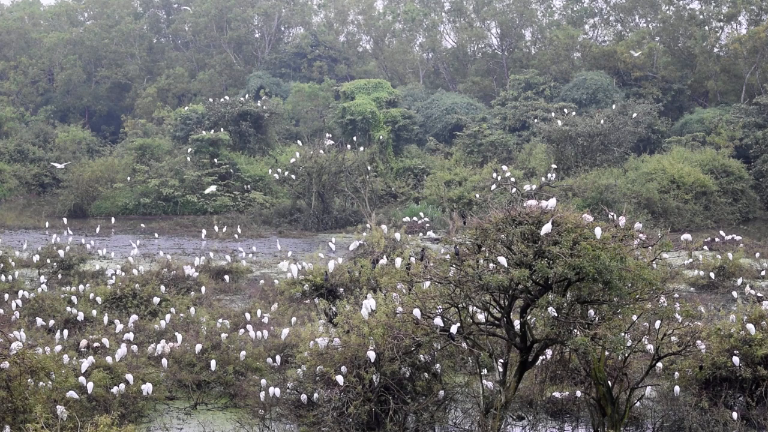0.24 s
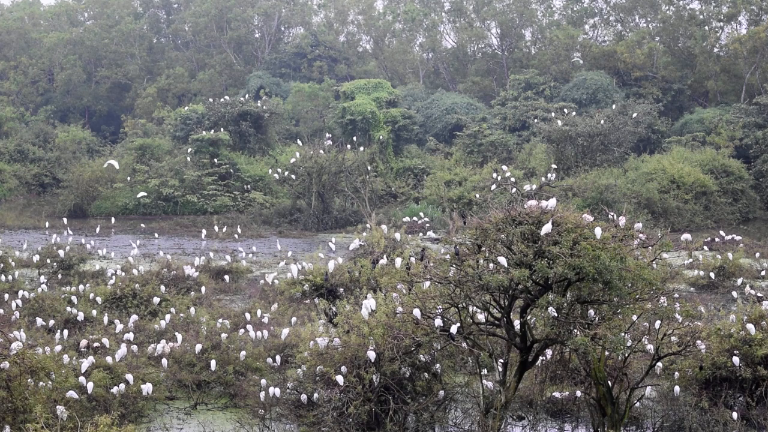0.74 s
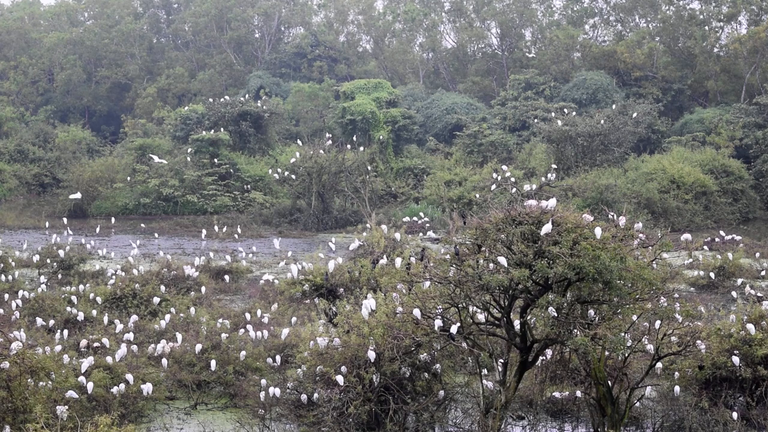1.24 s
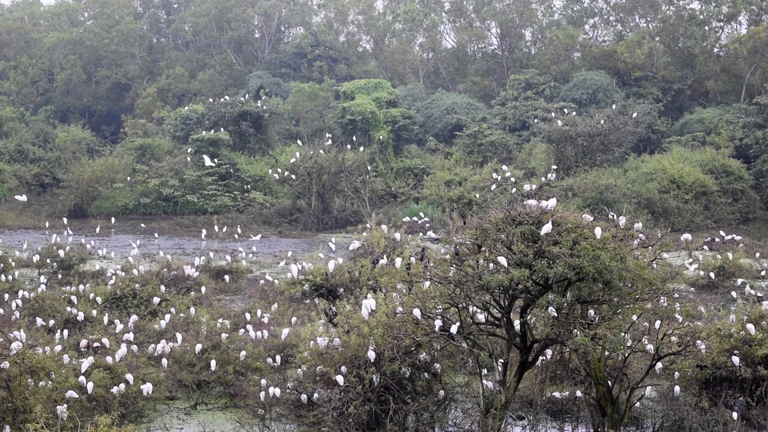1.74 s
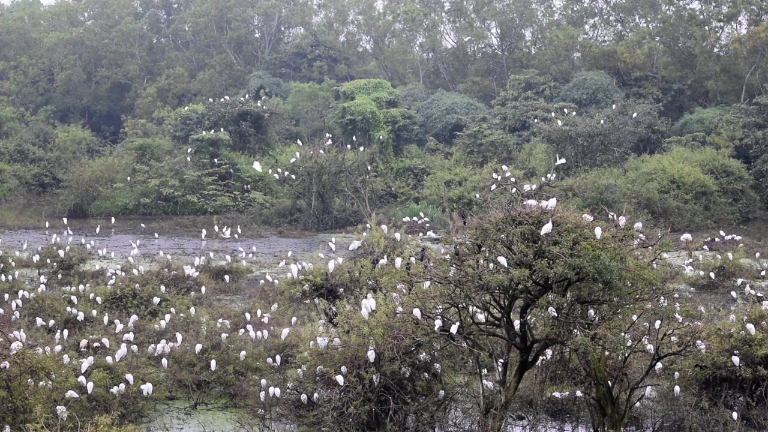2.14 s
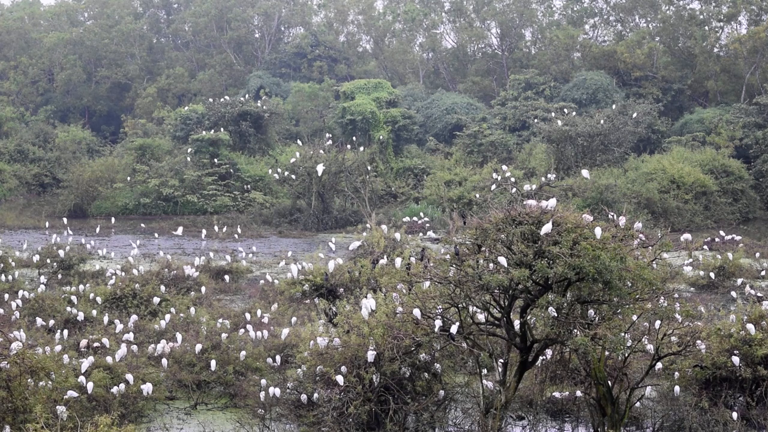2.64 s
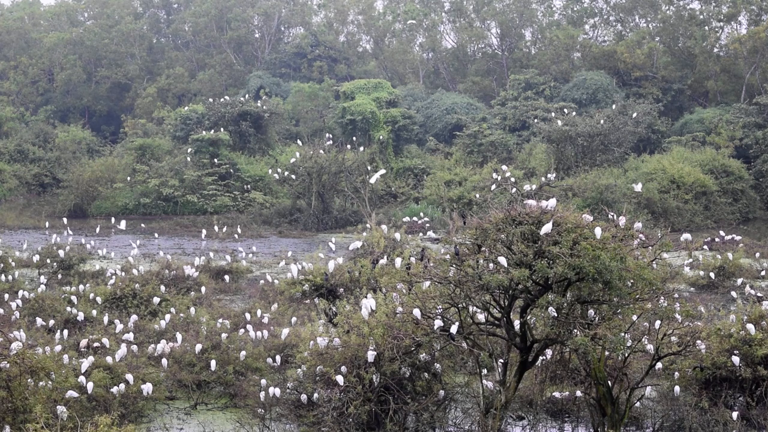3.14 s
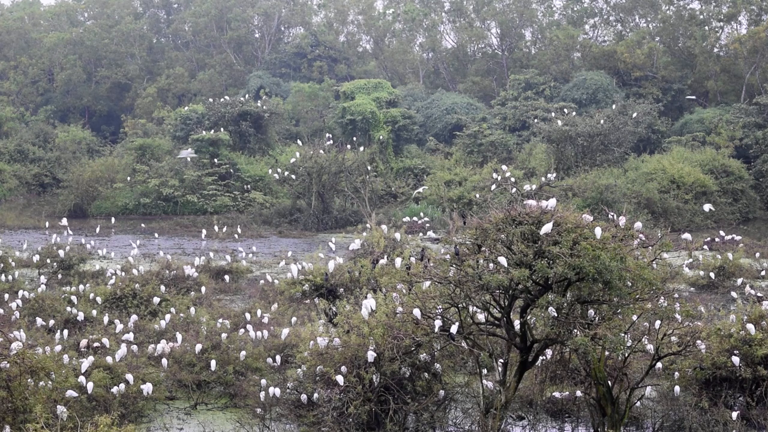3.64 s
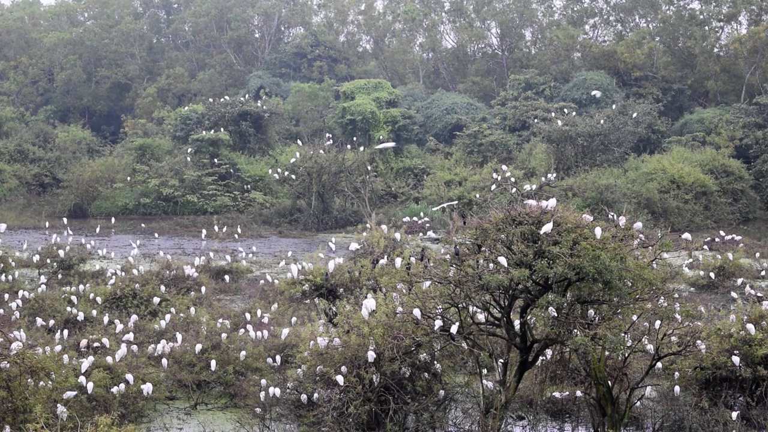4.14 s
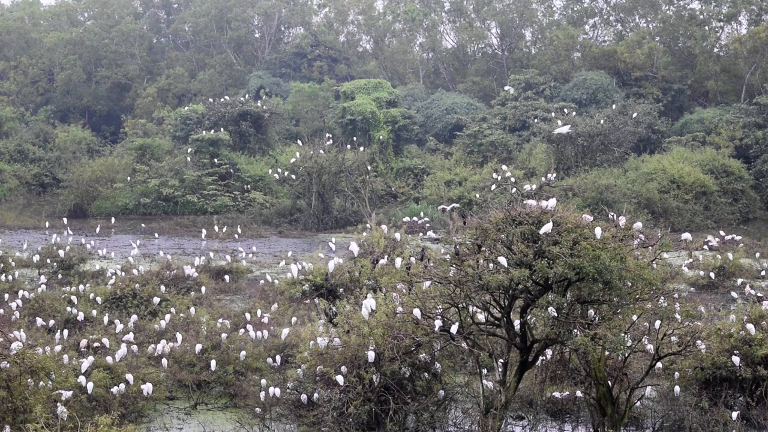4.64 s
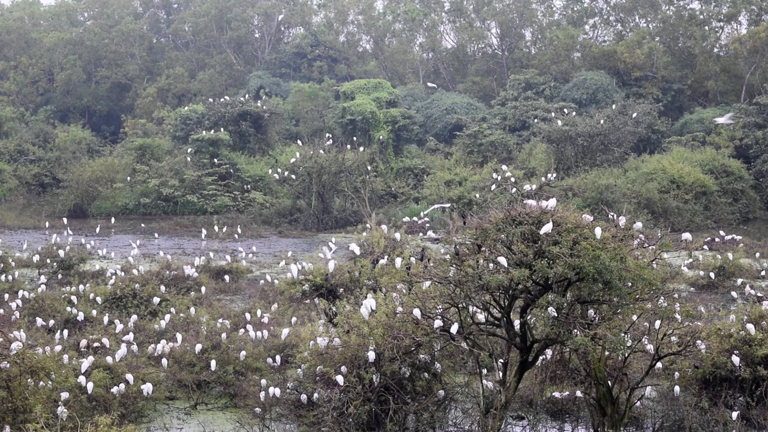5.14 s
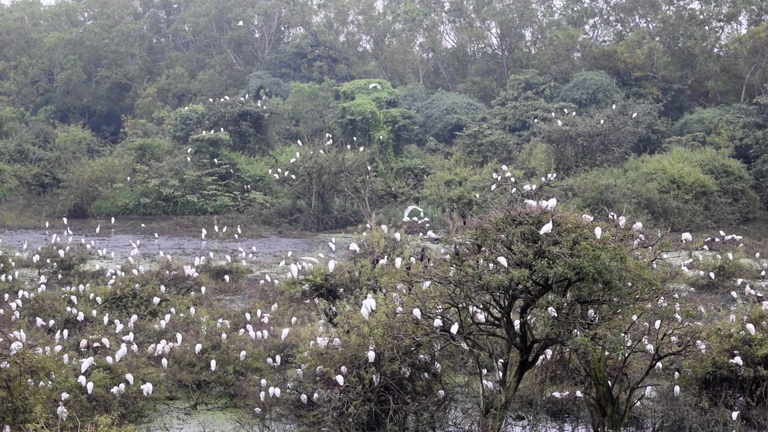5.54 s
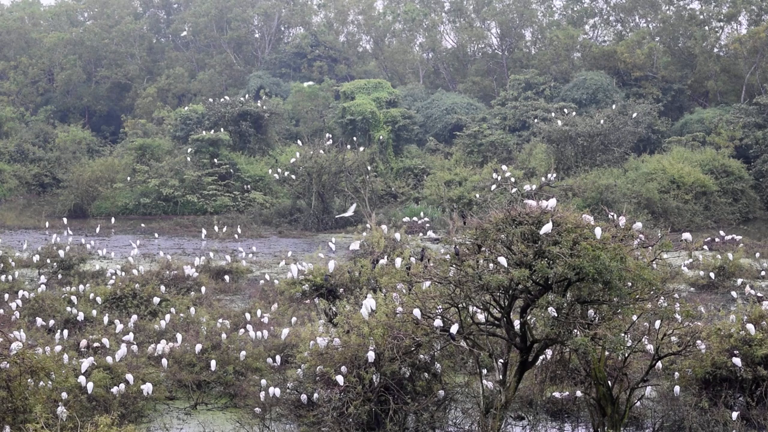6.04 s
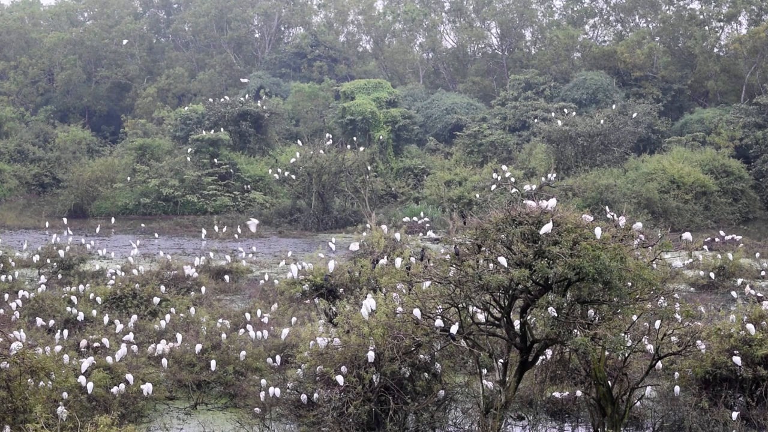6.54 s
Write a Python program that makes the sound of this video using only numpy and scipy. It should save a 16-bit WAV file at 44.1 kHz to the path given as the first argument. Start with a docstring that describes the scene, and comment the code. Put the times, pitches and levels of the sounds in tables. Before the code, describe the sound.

Continuous babble of countless waterbirds across a marsh, adults mid-pitched and rough, young ones shriller. Single croaks and short hoots or yelps stand out irregularly at first. At about three and a half seconds one close egret starts a series of about six croaks a second, abrupt and strong, soon sinking into coarser, softer rasps. Begging chicks and high trills persist; an open microphone picks up woodland reverberation and barely audible breeze.

```python
"""A near egret runs through a long series of croaks that sink and slow, made of rasping pulses and air
shaped by throat resonances. Other birds croak, squawk, screech, hoot and yelp in the same way or as whistles.
Behind them are begging chicks, thin shivering trills and a far din of voices made of patchy noise.
Insect bands, the echoing wooded bank, a light breeze on the microphone and a faint drone fill the marsh."""
import sys
import numpy as np
from scipy import signal
from scipy.fft import rfft, irfft, next_fast_len
from scipy.io import wavfile
from scipy.ndimage import map_coordinates

SR = 44100
rng = np.random.default_rng(int(sys.argv[2]) if len(sys.argv) > 2 else 0)


def put_to_file(sound):
    """Save the sound as 16-bit audio at rate SR, in the file named by the first command-line argument."""
    columns = np.atleast_2d(sound).T  # one column per channel
    safe = np.clip(columns, -1, 1)
    whole_steps = np.round(safe * 32767)
    wavfile.write(sys.argv[1], SR, whole_steps.astype(np.int16))


N = 298998

# how loud the far colony is over time: start_s, adults_db, young_db
COLONY_LEVELS = [(0, -44, -41), (.38, -43, -43), (.46, -46, -43.5), (.58, -44.5, -41), (.76, -46.5, -43.5),
                 (1.05, -43.5, -42.5), (1.2, -44, -45), (1.43, -46, -43.5), (1.52, -46, -42.5),
                 (2, -44, -40.5), (2.62, -45, -42), (2.78, -46, -45), (2.95, -43, -41.5),
                 (3.28, -45.5, -42.5), (3.52, -41.5, -39), (3.7, -42, -38), (4.55, -43.5, -40.5),
                 (5.93, -44.5, -39.5), (6.01, -45, -43.5), (6.1, -44.5, -40.5), (6.3, -43.5, -39),
                 (6.38, -45, -40), (6.46, -42.5, -39.5), (6.78, -45.5, -39.5)]
# throat of a squawking bird: multiple (of the main resonance), width_hz, level_db (relative)
OPEN_BILL_THROAT = [(.65, 814, 0), (1, 1350, 0.5), (1.8, 3040, -12.5)]
SQUAWK_HZ, SQUAWK_S = 3765, 0.07  # main throat resonance; a quarter of the whole squawk


def series():
    """The near bird starts high, abrupt and strongly pulsed, then sinks into weaker, longer, coarser croaks."""
    # the near bird's croaks: middle_s, level_db, length_s (a quarter of the whole croak)
    croak_times = [(3.571, -29.5, 0.047), (3.721, -26.5, 0.038), (3.873, -28.5, .036),
                   (4.021, -30.5, 0.046), (4.173, -35, 0.052), (4.317, -34.5, 0.07), (4.472, -36.5, 0.05),
                   (4.639, -39, 0.069), (4.795, -38, 0.094), (4.965, -39, .097), (5.144, -36.5, 0.062),
                   (5.311, -38, 0.08), (5.491, -39, .095), (5.68, -40, 0.075), (5.891, -39.5, 0.087),
                   (6.078, -39, 0.082), (6.242, -36.5, .06), (6.445, -38.5, 0.091), (6.628, -37.5, 0.076)]
    # its throat: multiple (of the main resonance), width_hz, level_db (relative)
    throat = [(.52, 300, -8), (.85, 460, -10), (0.999, 700, 5), (1.6, 1500, -12.5), (2.4, 3270, -6)]
    calming_s = 0.42
    first_s = croak_times[0][0]
    out = np.zeros(N)
    for s, db, length in croak_times:
        excitement = np.exp(-((s - first_s) / calming_s) ** 2)

        def mood(calm, excited):
            """A setting of the voice between calm and excited."""
            return calm + (excited - calm) * excitement

        voice = call(mood(1705, 2290), length, throat,  # throat resonance in Hz
                     pulse_hz=mood(129.65, 186), rough=mood(0.39, 0.26), fall=0.091,
                     attack=mood(2.17, 2.9), release=1.58)
        add(out, s, amp(db) * voice)
    return perch(out)


def perch(x):
    """Boughs round the near bird's perch reinforce fixed tones by echo; the overall level is kept."""
    # reinforced tones: tone_hz, width_hz, level_db (relative to the direct voice)
    tones = [(980, 60, 1), (1320, 50, -2), (1490, 120, -2), (1695, 60, -3), (1805, 40, 0), (1970, 45, 1),
             (2075, 35, -3), (2218, 50, 0), (2345, 45, -2)]

    def ring(f):
        """The direct voice plus each ringing tone."""
        response = 1
        for hz, width, db in tones:
            response = response + amp(db) * 1j * f * width / (hz * hz - f * f + 1j * f * width)
        return response

    return unit(filtered(x, ring)) * np.std(x)


def croaks():
    """Short croaks of other adults: one strong resonance, weaker ones below it and a harsh top."""
    # single croaks: middle_s, level_db, throat_hz, length_s (a quarter of the whole croak)
    croak_times = [(0.115, -35, 1390, 0.034), (0.276, -34.5, 1980, 0.037), (0.513, -43, 1500, 0.042),
                   (.653, -41, 1520, 0.044), (.826, -42.5, 1380, 0.028), (1.048, -40.5, 1750, .04),
                   (1.315, -40, 1770, 0.061), (1.634, -39, 1410, .024), (1.974, -39.5, 1580, 0.048),
                   (2.158, -39.5, 2170, 0.04), (2.296, -37, 1550, 0.037), (2.431, -40, 1520, 0.035),
                   (2.503, -40.5, 2540, .038), (2.621, -39, 2630, .045), (2.893, -40, 2070, .05),
                   (2.991, -43.5, 1570, .04), (3.11, -42.5, 1940, .04), (3.265, -43.5, 1450, 0.044),
                   (3.386, -39, 1450, 0.042)]
    # their throat: multiple (of the main resonance), width_hz, level_db (relative)
    throat = [(.57, 365, -6), (.8, 635, -8.5), (1, 543, 3.5), (2, 3100, -7)]
    out = np.zeros(N)
    for s, db, hz, length in croak_times:
        voice = call(hz, length, throat, pulse_hz=259.0, rough=0.16, fall=0.079, attack=2.9, release=2.1)
        add(out, s, amp(db) * voice)
    return out


def squawks():
    """Harsh squawks through a wide-open bill: pulses and breath in nearly equal parts."""
    # squawks: middle_s, level_db
    squawk_times = [(.385, -42), (1.038, -43), (1.497, -41), (1.795, -44), (1.97, -44), (2.302, -42.5),
                    (2.53, -42), (2.646, -43), (2.867, -43), (3.56, -33.5), (3.869, -45), (4.349, -43),
                    (4.857, -41), (5.312, -43), (5.792, -47)]
    out = np.zeros(N)
    for s, db in squawk_times:
        voice = call(SQUAWK_HZ, SQUAWK_S, OPEN_BILL_THROAT, pulse_hz=189.4, rough=0.48, fall=0.023)
        add(out, s, amp(db) * voice)
    return out


def screeches():
    """Hissing screeches that are nearly all air, each with more or less of a wide, shrill top."""
    # screeches: middle_s, level_db, top_db (relative strength of the shrill top)
    screech_times = [(.13, -48, -4), (0.238, -50, -8), (.365, -42.5, -9), (1.96, -54, -10),
                     (2.485, -55, 12), (3.561, -40, 9), (3.625, -42, -1), (3.727, -49, 13),
                     (3.789, -59, 12), (3.876, -55, 10), (4.691, -51, 9), (4.901, -54, 10), (5.53, -51, -4)]
    # their throat: multiple (of the main resonance), width_hz, level_db (relative)
    throat = [(.8, 1430, 11.5), (1, 2000, 11)]
    # the shrill top: multiple (of the main resonance), width_hz
    shrill_top = (1.21, 4500)
    throat_hz, length_s = 6150, 0.075
    out = np.zeros(N)
    for s, db, top_db in screech_times:
        whole_throat = throat + [(*shrill_top, top_db)]
        voice = call(throat_hz, length_s, whole_throat, pulse_hz=258.6, rough=0.98, fall=0.056,
                     attack=2.2, release=1.8)
        add(out, s, amp(db) * voice)
    return out


def notes():
    """Clear, hollow hoots and yelps: whistled tones that hold or slide down in pitch."""
    # notes: middle_s, level_db, pitch_hz (halfway), length_s, fall (natural log of the pitch, each side)
    note_times = [(0.149, -58, 345, 0.28, 0.07), (0.821, -43, 1330, .055, 0.03),
                  (0.897, -43.5, 3000, 0.081, 0.05), (.928, -45, 2050, .05, .01),
                  (0.975, -46, 2690, .06, 0.07), (1.026, -40, 2120, 0.11, .1), (1.63, -54, 692, 0.067, 0),
                  (2.504, -40, 2350, 0.058, 0.1), (2.726, -41.5, 2060, .08, .06),
                  (2.947, -58, 558, 0.162, 0.07), (3.44, -45.5, 1180, 0.15, 0.09),
                  (5.29, -46.5, 4050, .11, 0.1), (5.79, -46, 4170, 0.17, 0.06),
                  (5.905, -45, 1278, 0.1, 0.1)]
    out = np.zeros(N)
    for s, db, hz, length, fall in note_times:
        u = np.linspace(1, -1, int(length * SR))
        loudness = amp(db + 1.8 * wobble(84.0, len(u))) * np.hanning(len(u))
        add(out, s, loudness * whistle(hz * np.exp(fall * u), waver=.01))
    return out


def chicks():
    """Two nestlings whine softly and break into chirping begging, each a rasp in a narrow, buzzing band."""
    # bouts of begging: start_s, end_s, level_db
    bouts = [(-.1, .237, -46), (.37, .63, -44), (.683, 0.803, -45), (0.787, 0.946, -43.5),
             (1.144, 1.36, -43.5), (1.553, 1.92, -46), (1.905, 2.32, -45), (2.312, 2.722, -45),
             (2.84, 3.077, -46), (3.164, 3.303, -46.5), (3.47, 3.72, -44.5), (4.127, 4.426, -46.5),
             (4.647, 5, -46.5), (5.08, 5.618, -48.5), (6.187, 6.654, -47)]
    # the two nestlings: throat_hz, pulse_hz
    voices = [(2820, 170), (3050, 210)]
    whine_db, fade_s = -50, 0.026  # level between bouts; edges of a bout
    chirp_rate_hz, chirp_depth_db = 24, 1.5  # average rate of the quick swells; swing each way
    t = np.arange(N) / SR
    effort = np.full(N, amp(whine_db))
    for start, end, db in bouts:
        fade = np.clip(np.minimum(t - start, end - t) / fade_s, 0, 1)
        effort = np.maximum(effort, amp(db) * fade)
    out = np.zeros(N)
    for hz, pulse_hz in voices:
        chirp = np.sin(2 * np.pi * np.cumsum(chirp_rate_hz * np.exp(0.247 * wobble(8))) / SR)
        source = rasp(N, pulse_hz, jitter=.15, rough=0.54)
        buzz = resonance(source, hz * np.exp(0.024 * wobble(14)), width_hz=420)
        out += effort * unit(amp(chirp_depth_db * chirp) * buzz)
    return out


def trills():
    """Two thin whistling voices: one slides up and holds its pitch, the other arches higher and back."""
    # trills that hold their pitch: start_s, end_s, level_db
    held = [(0.25, 0.627, -52), (0.93, 1.213, -52.5), (1.437, 1.802, -50), (1.816, 2.205, -55.5),
            (2.379, 2.76, -51.5), (2.902, 3.174, -57), (3.311, 3.614, -50), (4.128, 4.453, -48.5),
            (4.931, 5.29, -49), (5.851, 6.26, -50)]
    # trills that arch: start_s, end_s, level_db
    arched = [(0.152, 0.555, -50), (0.919, 1.24, -53.5), (1.519, 2.125, -53), (2.338, 2.718, -56),
              (3.002, 3.42, -52), (3.782, 4.301, -54), (4.675, 5.022, -53.5), (5.3, 5.718, -52.5),
              (5.97, 6.422, -52.5)]
    held_hz, scoop_hz, scoop_s = 4983, 188.3, 0.11  # held pitch; starts this far below; time to close in
    foot_hz, rise_hz = 4975, 274.2  # foot of the arch and its height
    out = np.zeros(N)
    for start, end, db in held:
        t = np.arange(int((end - start) * SR)) / SR
        pitch = held_hz - scoop_hz * np.exp(-t / scoop_s)
        add(out, (start + end) / 2, amp(db) * trill(pitch, waver=0.0197))
    for start, end, db in arched:
        arch = np.sin(np.linspace(0, np.pi, int((end - start) * SR)))
        add(out, (start + end) / 2, amp(db) * trill(foot_hz + rise_hz * arch, waver=.03))
    return out


def trill(hz, waver):
    """A whistle along a pitch curve whose loudness shivers quickly."""
    shiver_hz = 31.6
    shiver = amp(3.9 * np.sin(2 * np.pi * shiver_hz * np.arange(len(hz)) / SR))
    return whistle(hz, waver) * shiver * signal.windows.tukey(len(hz), .35)


def crowd(count=90):
    """Passing croaks that rise and fall with the din, each bird with its own throat and pulse rate."""
    throat = [(.48, 206, -11.5), (1, 251, -1), (1.7, 500, -6.5)]  # multiple, width_hz, level_db
    out = np.zeros(N)
    for i, (when, size, pace, near) in enumerate(rng.random((count, 4))):
        # the louder birds also pulse faster
        voice = call(1150 + 1800 * size, .025 + .04 * pace, throat,
                     pulse_hz=150 + 300 * near, rough=0.11, fall=0.077)
        add(out, (i + when) / count * N / SR, amp(5 * near) * voice)  # nearest: 5 dB louder
    adults_db = curves(COLONY_LEVELS)[0]
    return amp(adults_db - 5) * out


def squabbles(count=20):
    """Fainter squawks from the colony, louder when the young birds are restless."""
    out = np.zeros(N)
    for i, (when, size, near) in enumerate(rng.random((count, 3))):
        hz = SQUAWK_HZ * np.exp(0.25 * (size - .5))
        voice = call(hz, SQUAWK_S, OPEN_BILL_THROAT, pulse_hz=192.7, rough=0.6, fall=0.13)
        add(out, (i + when) / count * N / SR, amp(5 * near) * voice)  # nearest: 5 dB louder
    young_db = curves(COLONY_LEVELS)[1]
    return amp(young_db - 8) * out


def far_colony():
    """The din across the marsh: two layers of babble, adults and young birds, swelling separately."""
    # tone colour of the far adults: pitch_hz, level_db (relative)
    adult_colour = [(25, -54), (60, -29), (140, -19.5), (190, -17.5), (280, -15.5), (430, -6), (550, -9.5),
                    (820, -4), (950, -2.5), (1400, -1), (1900, 3.5), (2500, -9), (3500, -7), (7000, -41.5)]
    # tone colour of the far young birds: pitch_hz, level_db (relative)
    young_colour = [(500, -38), (1500, -6), (2400, 6), (3100, 1), (3600, 1.5), (4600, 0), (5600, -5.5),
                    (7000, -16.5), (8200, -21.5), (10000, -25.5), (12500, -34), (15500, -57)]
    adults_db, young_db = curves(COLONY_LEVELS)
    adults = amp(adults_db) * babble(adult_colour, patchy_db=2.5)
    young = amp(young_db) * babble(young_colour, patchy_db=3.0)
    return adults + young


def babble(spectrum, patchy_db):
    """Countless far voices merge into noise with short patches of louder and softer sound."""
    z = signal.stft(rng.standard_normal((2, N)), nperseg=1024)[2]
    patch = np.outer(np.hanning(9), np.hanning(9))
    field = signal.fftconvolve(rng.standard_normal(z.shape[1:]), patch, "same")
    pair = signal.istft(z * amp(patchy_db * unit(field)), nperseg=1024)[1][:, :N]
    return unit(filtered(pair, lambda hz: amp(along(spectrum, hz))))


def insects():
    """Steady shrill bands of noise and a faint, changing high hiss from the reeds."""
    # steady bands: middle_hz, width_hz, level_db
    shrill_bands = [(8640, 1200, -63.5), (11730, 330, -75)]
    # level of the high hiss: time_s, level_db
    hiss_levels = [(0, -85.5), (2.8, -81), (3.9, -78), (4.34, -73), (6.1, -70), (6.33, -83), (6.78, -83)]
    bands = sum(amp(db) * resonance(rng.standard_normal(N), hz, width) for hz, width, db in shrill_bands)
    hiss = resonance(rng.standard_normal(N), 12700, width_hz=7500)
    return bands + amp(curves(hiss_levels)[0]) * hiss


def woods(x, decay):
    """The diffuse answer of trees: noise that dies away at a different speed for each frequency."""
    hz, t, z = signal.stft(rng.standard_normal((2, SR)), SR, nperseg=256)
    fading = amp(-60 * t / along(decay, hz)[:, None])
    tail = signal.istft(z * fading, SR, nperseg=256)[1]
    return signal.fftconvolve(x[None], tail / np.linalg.norm(tail[0]), axes=1)[:, :N]


def breeze():
    """Soft low puffs and a faint rumble of deep noise, different at each microphone port."""
    # puffs: middle_s, level_db (at the peak)
    puff_times = [(0.139, -65), (.435, -63), (5.83, -71), (6.183, -67)]
    out = amp(-92.0) * np.array([resonance(rng.standard_normal(N), 85, width_hz=75) for port in range(2)])
    size = int(0.109 * SR)  # length of a puff, from seconds
    for port in out:
        for s, db in puff_times:
            puff = np.hanning(size) * resonance(rng.standard_normal(size), 75, width_hz=100)
            add(port, s, amp(db) * puff)
    return out


def drone():
    """A faint, distant low drone, a band of noise that fades steadily."""
    start_db, fade_db_per_s = -70, 2.5
    db = start_db - fade_db_per_s * np.arange(N) / SR
    return amp(db) * resonance(rng.standard_normal(N), 195.5, width_hz=142)


def call(hz, length, throat, pulse_hz, rough, fall, attack=2.5, release=2.0):
    """A rasp swells and fades while its pulses slow and the throat resonances sink."""
    length = np.clip(length, .015, .25)
    u = np.linspace(-2, 2, int(4 * length * SR))  # 0 at the top of the swell
    pace = pulse_hz * np.exp(.08 * rng.standard_normal() - .12 * u)
    source = rasp(len(u), pace, jitter=.12, rough=rough)
    sinking_hz = hz * np.exp(-fall * np.tanh(1.75 * u))
    voice = sum(amp(db) * resonance(source, k * sinking_hz, width) for k, width, db in throat)
    steepness = np.where(u < 0, attack, release)
    swell = np.cos(np.pi * u / 4) / (1 + (steepness * u) ** 2)
    # about rms 1 at the top of the swell
    return unit(foliage(voice * swell)) * np.sqrt(np.mean(swell ** 2))


def rasp(size, pulse_hz, jitter, rough, scatter_db=0.7):
    """Uneven pulses of a syrinx (a bird's voice box), each followed by a puff of turbulent air."""
    cycle = np.cumsum(pulse_hz * np.exp(jitter * wobble(150, size))) / SR + rng.random()
    pulses = np.diff(np.floor(cycle), prepend=0) * amp(scatter_db * rng.standard_normal(size))
    air = rng.standard_normal(size) * np.exp(-2 * (cycle % 1))
    rough = np.clip(rough, 0, 1)  # share of air in the power
    return np.sqrt(1 - rough) * unit(pulses) + np.sqrt(rough) * unit(air)


def foliage(x, count=8):
    """Leaves and twigs round a perch scatter weak copies that blur each pulse."""
    paths = np.zeros(SR // 100)
    paths[rng.integers(20, len(paths), count)] = 0.27 * rng.standard_normal(count)
    paths[0] = 1  # the direct sound
    return signal.fftconvolve(x, paths)[:len(x)]


def bassless(x):
    """A small bird radiates no bass: sound well below 450 Hz fades out."""
    return filtered(x, lambda hz: hz ** 4 / (hz ** 4 + 450 ** 4))


def whistle(hz, waver):
    """A pure tone of rms 1 whose pitch flutters quickly about a curve."""
    flutter = np.exp(waver * wobble(400, len(hz)))
    return np.sqrt(2) * np.sin(2 * np.pi * np.cumsum(hz * flutter) / SR)


def resonance(x, hz, width_hz):
    """x through a steep resonance (three equal poles) whose centre may move; rms 1."""
    turn = np.exp(2j * np.pi * np.cumsum(hz + np.zeros(len(x))) / SR)
    pole = np.exp(-np.pi * abs(width_hz) / SR)
    # shift the centre down to 0 Hz, smooth, and shift back
    smooth = signal.lfilter([1], np.poly([pole] * 3), x / turn)
    return unit((smooth * turn).real)


def spread(pair):
    """Two unrelated signals to left and right: near mono in the middle range, wider in the treble."""
    # how alike left and right are: pitch_hz, likeness (0 to 1)
    likeness = [(60, 1), (130, 0.69), (290, 0.88), (640, 0.91), (1410, 0.99), (3100, 0.79), (6820, 0.72),
                (15000, 0.17)]

    def turn(hz):
        """Angle that mixes the shared and the opposed part."""
        return np.arccos(np.clip(along(likeness, hz), 0, 1)) / 2

    mid, side = filtered(pair, lambda hz: np.array([np.cos(turn(hz)), np.sin(turn(hz))]))
    return np.array([mid + side, mid - side])


def amp(db):
    """Decibels to gain."""
    return 10 ** (np.asarray(db) / 20)


def unit(x):
    """Scaled to rms 1."""
    return x / np.sqrt(np.mean(x ** 2) + 1e-20)


def along(points, hz):
    """Values between (Hz, value) points, on a log frequency axis."""
    f, v = np.transpose(points)
    return np.interp(np.log(hz + 1), np.log(f + 1), v)


def curves(rows):
    """One value per sample for each column after the time."""
    s, *cols = np.transpose(rows)
    return [np.interp(np.arange(N) / SR, s, c) for c in cols]


def wobble(rate, size=N):
    """A smooth random curve, rate knots a second."""
    knots = rng.standard_normal(int(size * rate / SR) + 4)
    return map_coordinates(knots, [np.arange(size) * rate / SR], order=2)


def filtered(x, response):
    """x shaped by a response that depends on frequency."""
    m = next_fast_len(N + SR // 4)
    return irfft(rfft(x, m) * response(np.fft.rfftfreq(m, 1 / SR)), m)[..., :N]


def add(track, s, sound):
    """Mix a sound into the track, centred on time s."""
    start = round(s * SR) - len(sound) // 2
    lo, hi = max(start, 0), min(start + len(sound), N)
    if hi > lo:
        track[lo:hi] += sound[lo - start:hi - start]


def scene():
    """Voices straight ahead, in the wide din and echoes of the marsh."""
    # echo of the wooded bank: pitch_hz, decay_s (time to fall by 60 dB)
    bank_decay = [(200, 0.54), (2000, 0.73), (6000, 1), (14000, 0.28)]
    # echo of the near bird's own tree: pitch_hz, decay_s (time to fall by 60 dB)
    tree_decay = [(300, 0.11), (2000, 0.74), (6000, 0.22), (14000, 0.085)]
    near = bassless(series())
    others = bassless(croaks() + squawks() + screeches() + crowd() + squabbles())
    birds = near + others + notes() + chicks() + trills()
    echoes = amp(-7.5) * woods(birds, bank_decay) + amp(-12) * woods(near, tree_decay)
    around = echoes + far_colony() + np.array([insects(), insects()])
    return birds + spread(around) + breeze() + drone()


def record(dry):
    """Nothing is kept from 15750 Hz upward."""
    return filtered(dry, lambda hz: hz < 15750)


dry = scene()
out = record(dry)
put_to_file(out)
```